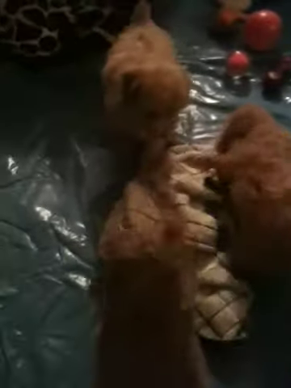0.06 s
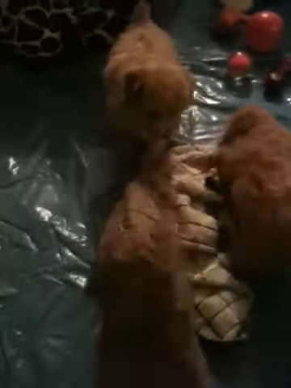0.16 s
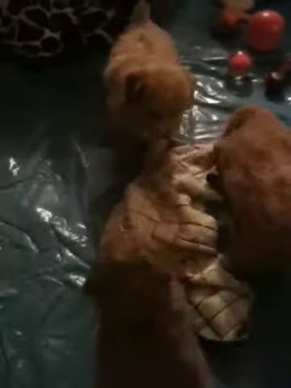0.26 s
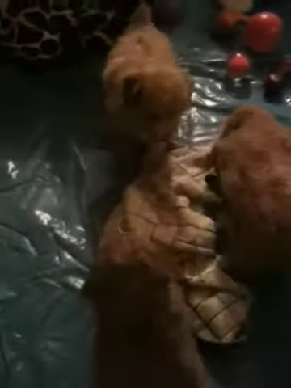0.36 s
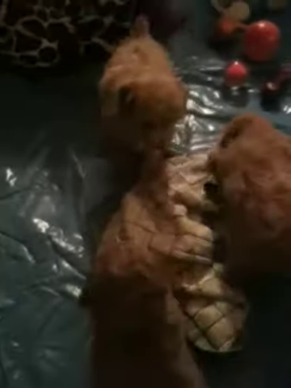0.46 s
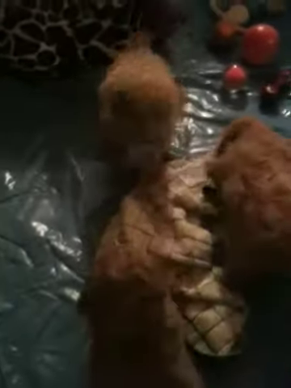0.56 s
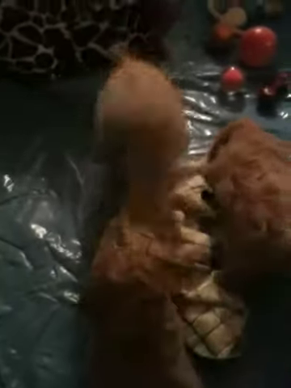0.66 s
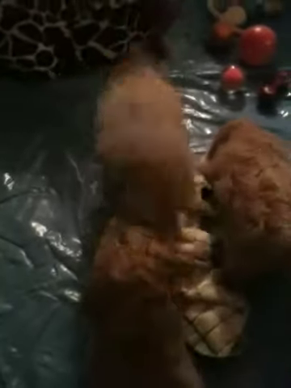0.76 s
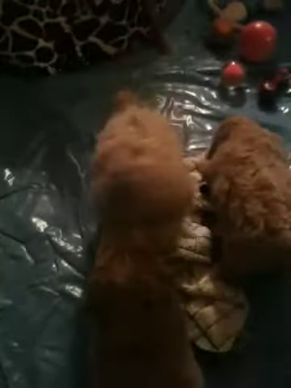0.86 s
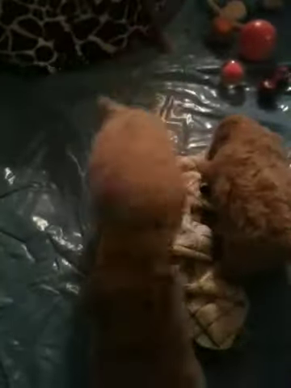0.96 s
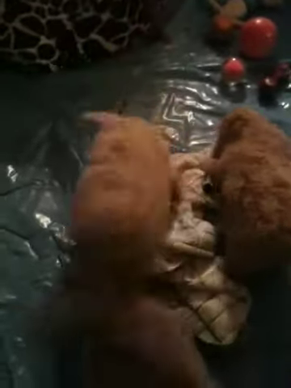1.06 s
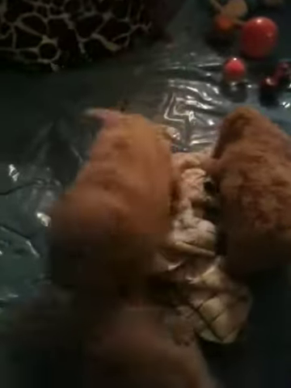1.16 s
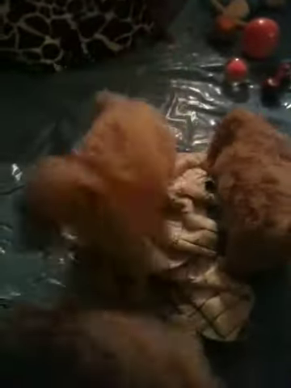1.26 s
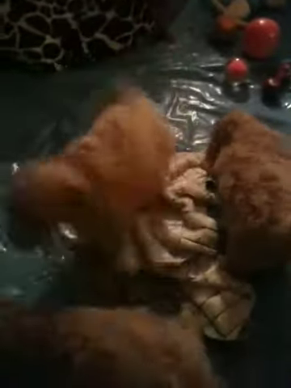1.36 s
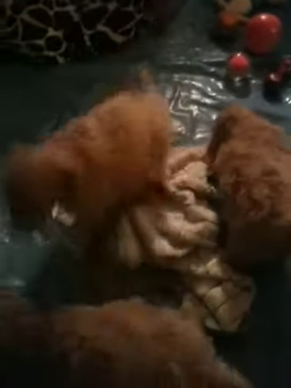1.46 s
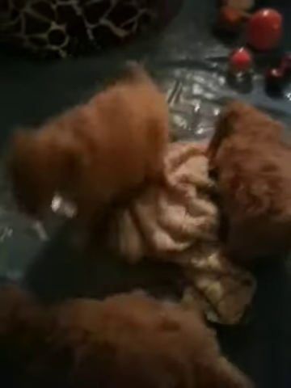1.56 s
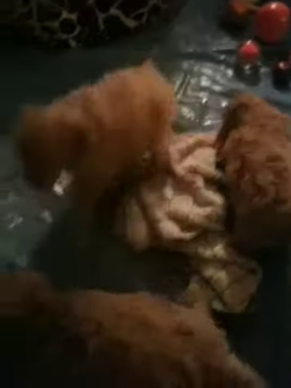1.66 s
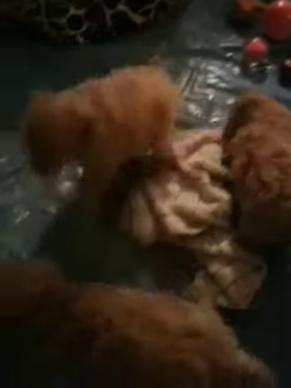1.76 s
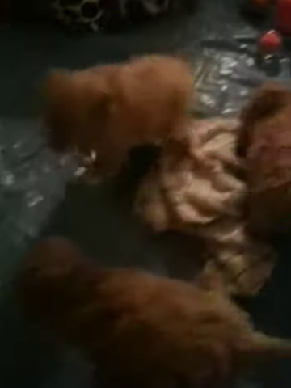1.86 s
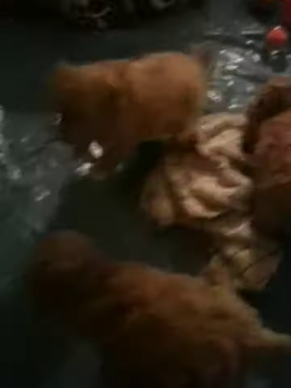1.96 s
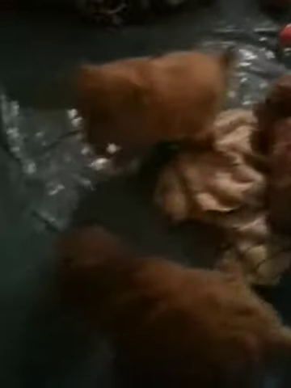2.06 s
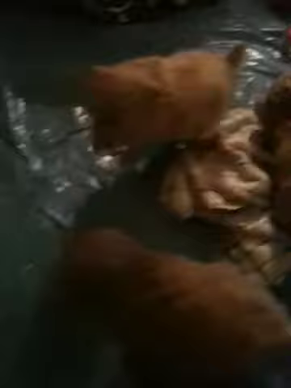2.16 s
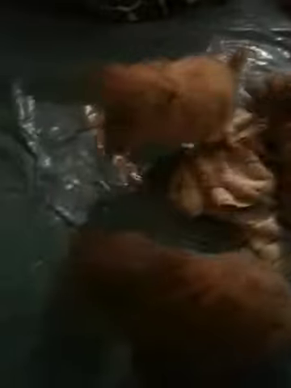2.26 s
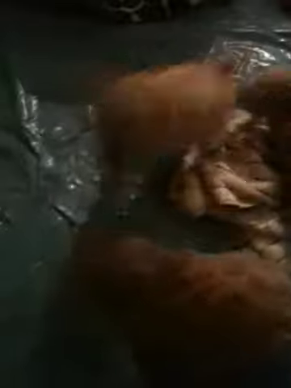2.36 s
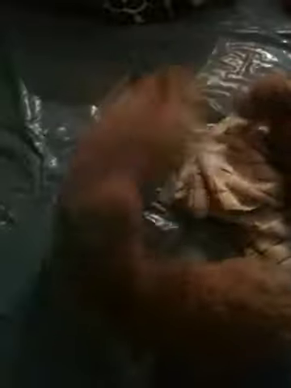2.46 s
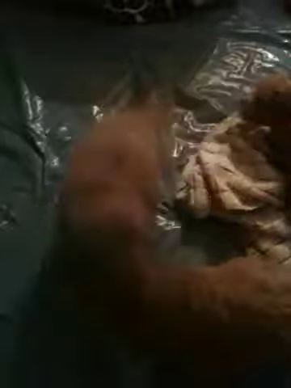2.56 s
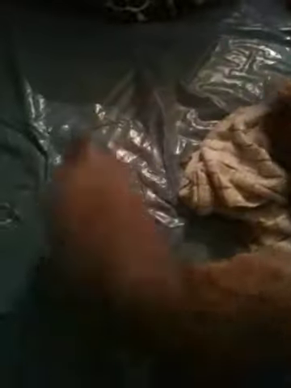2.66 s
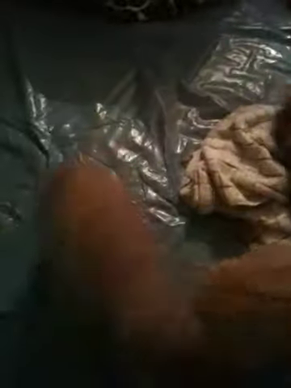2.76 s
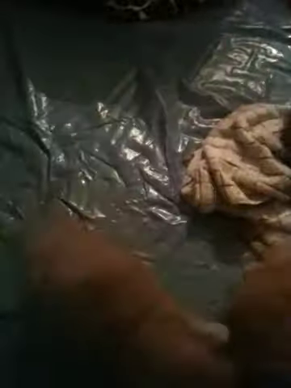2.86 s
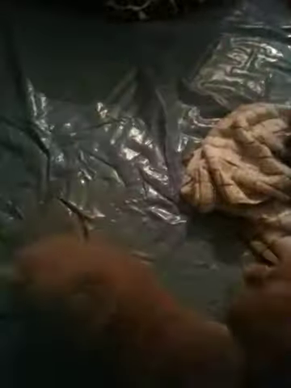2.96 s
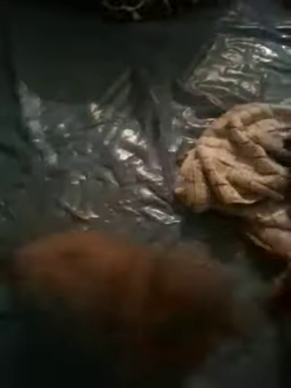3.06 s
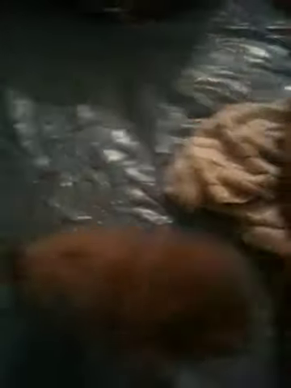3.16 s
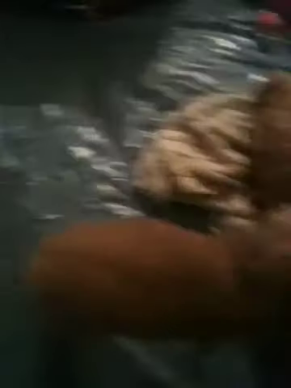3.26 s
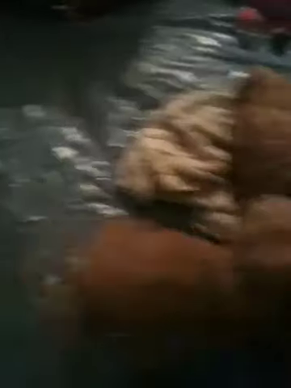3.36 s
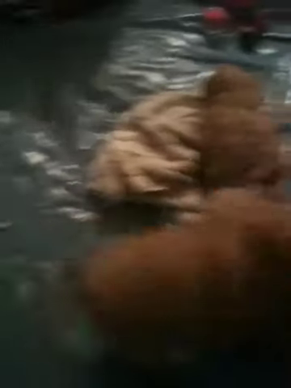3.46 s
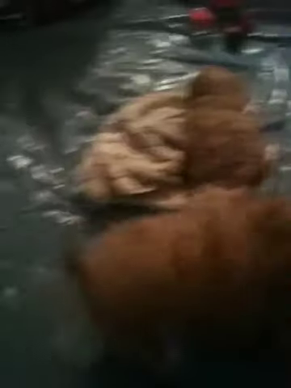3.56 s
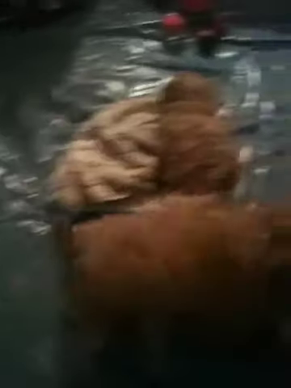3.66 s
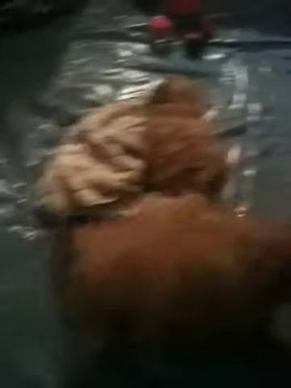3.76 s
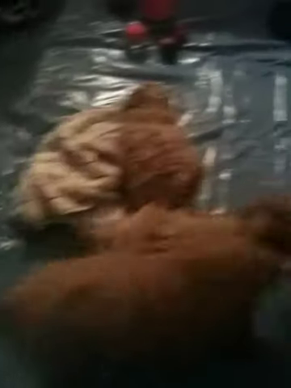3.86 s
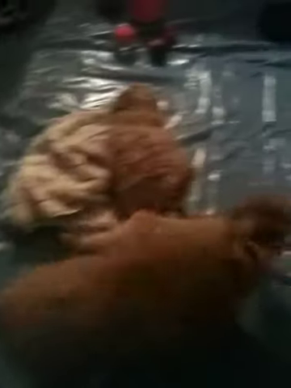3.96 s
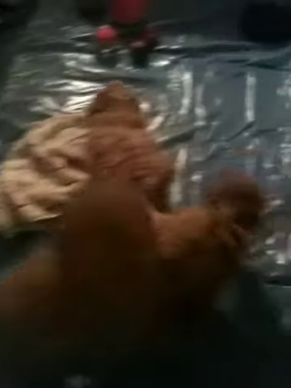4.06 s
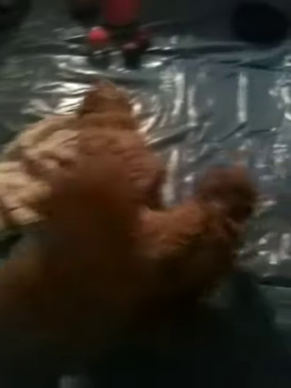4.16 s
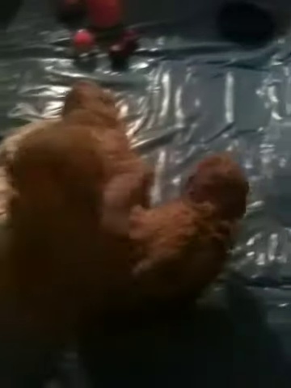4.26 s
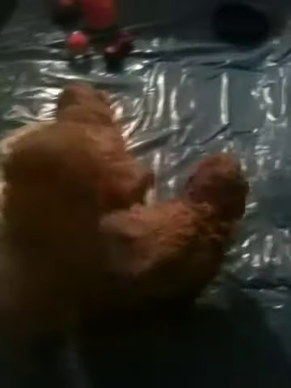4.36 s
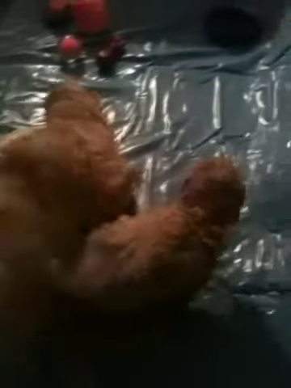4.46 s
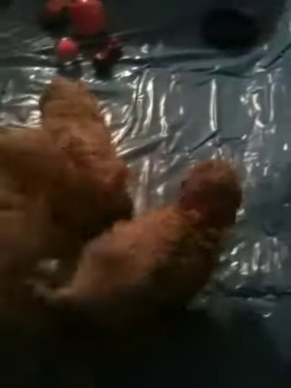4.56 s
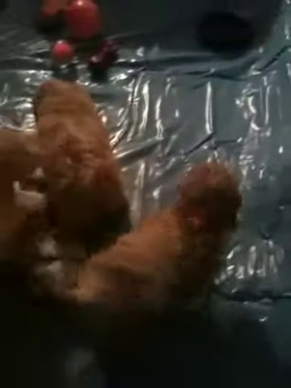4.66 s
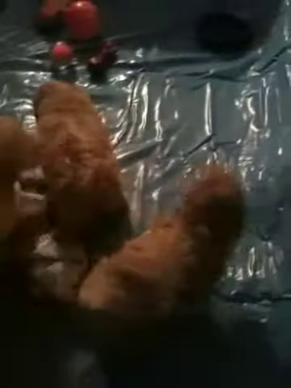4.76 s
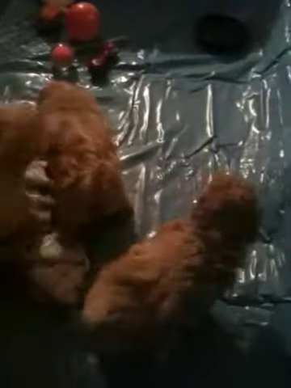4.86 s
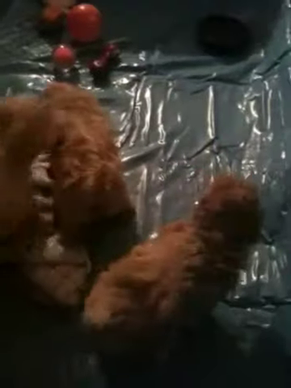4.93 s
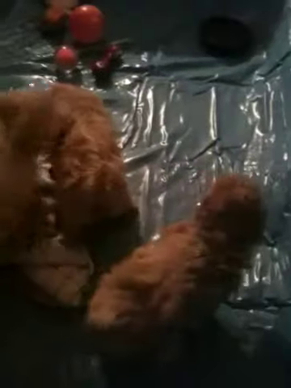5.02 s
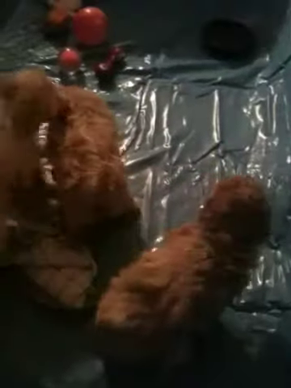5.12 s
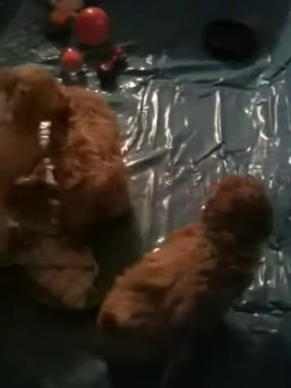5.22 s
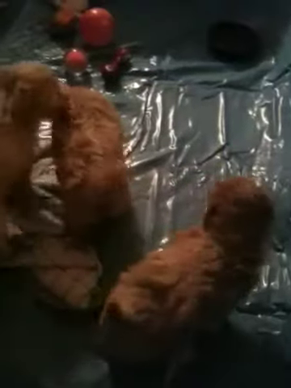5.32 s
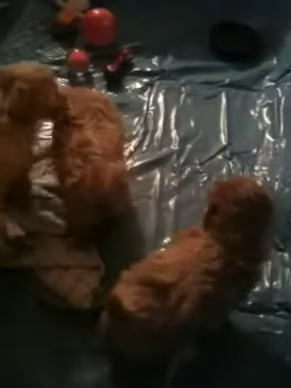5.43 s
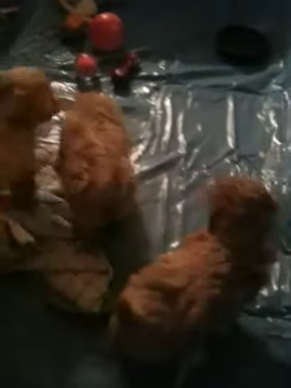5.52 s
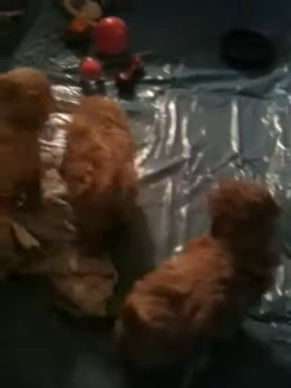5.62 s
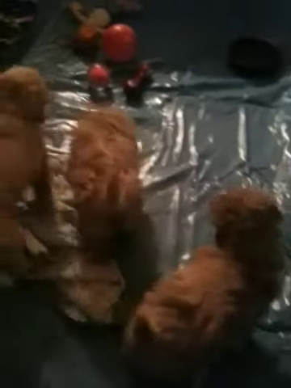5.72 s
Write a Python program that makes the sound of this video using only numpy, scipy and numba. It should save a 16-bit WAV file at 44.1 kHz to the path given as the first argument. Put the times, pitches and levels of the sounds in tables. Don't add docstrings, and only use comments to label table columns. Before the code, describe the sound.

Small puppies growl and give one bark in ragged, fluttering bursts while wrestling on a crinkly plastic sheet in a quiet room.

```python
import sys
import numpy as np
from scipy import signal
from scipy.fft import rfft, irfft, next_fast_len
from scipy.io import wavfile
from scipy.ndimage import uniform_filter1d
from numba import njit

SR = 44100
rng = np.random.default_rng(int(sys.argv[2]) if len(sys.argv) > 2 else 0)


def decibels_to_gain(level_db):
    exponent = np.asarray(level_db, float) / 20
    return 10 ** exponent


def materialize(psi):
    bounded = np.clip(np.atleast_2d(psi).T, -1, 1)
    quanta = np.round(bounded * 32767).astype(np.int16)
    wavfile.write(sys.argv[1], SR, quanta)


N = 255334
TIME = np.arange(N) / SR


def level(x, db):
    return x * decibels_to_gain(db) / np.sqrt(np.mean(x ** 2) + 1e-30)


@njit
def svf(x, hz, width):
    y, b, l = np.empty(len(x)), 0., 0.
    for i in range(len(x)):
        g, k = np.tan(np.pi * hz[i] / SR), width / hz[i]
        v = (b + g * (x[i] - l)) / (1 + g * (g + k))
        b = 2 * v - b
        l += 2 * g * v
        y[i] = k * v
    return y


def band(x, hz, width):
    return svf(x, np.full(len(x), float(hz)), float(width))


def colour(x, table):
    hz, db = np.transpose(table)
    size = next_fast_len(N)
    bins_hz = np.arange(1, size // 2 + 2) * SR / size
    gain = decibels_to_gain(np.interp(np.log(bins_hz), np.log(hz), db))
    return irfft(rfft(x, size) * gain, size)[:N]


def walk(n, rate):
    k = int(SR / rate)
    held = np.repeat(rng.standard_normal(n // k + 1), k)
    return uniform_filter1d(held, k)[:n]


def along(t, table):
    s, *columns = np.transpose(table)
    return [np.interp(t, s, c) for c in columns]


# f/Hz, level/dB per Hz
ROOM_SPECTRUM = [(18, -52.5), (30, -19), (64, -25), (88, -15), (124, -5), (170, 2.5), (499, -5),
                 (2230, -14), (6550, -21.5), (13000, -19), (14800, -16.5), (16000, -29.5)]


def room_tone():
    air = level(colour(rng.standard_normal(N), ROOM_SPECTRUM), -71.5)
    hum = np.sin(2 * np.pi * 119 * TIME + .8 * walk(N, 24)) * decibels_to_gain(1.7 * walk(N, 3.3))
    beat = 2 * np.pi * 30.1 * TIME
    beating = np.cos(beat) + .5 * np.cos(3 * beat)
    whine = np.sin(2 * np.pi * 15000 * TIME) * beating * decibels_to_gain(1.5 * walk(N, 9))
    return air + level(hum, -82) + level(whine, -81)


# chest, mouth, palate, cheek, muzzle, nose, lips
# width/Hz of each
AIRWAY_WIDTHS_HZ = (60., 220., 270., 260., 290., 340., 800.)
BREATH_SHARES = (2.17, 4.6, 7.5, 5.4, 9.1, 2.7, 16)
# f/Hz, width/Hz, share swallowed
POCKETS = [(505, 85, 0.75), (1250, 160, 0.7), (2950, 200, 0.5)]
MOUTH_SHUT_HZ, MOUTH_JAW_HZ = 796, 660
PALATE_EFFORT, PALATE_LIPS, PALATE_JAW_DB = 0.21, .2, 7
PATCHY_DB, WOBBLE, TREBLE_FADE = 2.2, .022, .75
FIRST_FLAP_S = .006


def growl(effort, voice, chest_hz, throat, colours, flutter, gullet, teeth):
    rough, flutter_hz, end_flutter_hz, depth = flutter
    bend, gullet_db, throat_db = gullet
    start_s, end_s = effort[0][0], effort[-1][0]
    start = int(start_s * SR)
    t = TIME[start:int(end_s * SR)]
    n = len(t)
    chest_db, mouth_db, jaw, muzzle_db = along(t, effort)
    voice_hz, partial_db, boom_db = along(t, voice)
    palate_hz, muzzle_hz, nose_hz, lips_hz = along(t, throat)
    palate_db, cheek_db, nose_db, lips_db = along(t, colours)
    mouth_hz = MOUTH_SHUT_HZ + MOUTH_JAW_HZ * jaw
    palate_db = palate_db + PALATE_EFFORT * mouth_db + PALATE_LIPS * muzzle_db + PALATE_JAW_DB * jaw

    flap_hz = np.linspace(flutter_hz, end_flutter_hz, n)
    phase = (np.cumsum(flap_hz) / SR - FIRST_FLAP_S * flutter_hz + .04 * walk(n, 25)) % 1
    opening = np.minimum(phase / .12, 1) * np.clip((.97 - phase) / .3, 0, 1)
    flap = 1 - depth * (1 - opening)

    pitch = voice_hz * (1 + bend * (phase - .5))
    cycles = np.cumsum(pitch * np.exp(.5 * rough * walk(n, 250))) / SR
    pulses = np.diff(np.floor(cycles), prepend=0) * decibels_to_gain(5 * rough * walk(n, 250))
    pulses = level(pulses - pulses.mean(), 0)
    gusts = (1 + .6 * np.cos(2 * np.pi * cycles)) * decibels_to_gain(1.5 * walk(n, 90))
    breath = rough * gusts * rng.standard_normal(n)

    def resonance(air, hz, width, db):
        hz = hz + 0 * t
        for _ in range(3):
            air = svf(air, hz, 2 * width)
        return level(flap * air, 0) * decibels_to_gain(chest_db + db)

    out = resonance(pulses + breath, pitch, 125., partial_db)
    out += resonance(pulses + 3.0 * breath, 340., 150., gullet_db)
    out += resonance(pulses + breath, 780, 340.0, throat_db + mouth_db / 2)
    dbs = (boom_db, mouth_db, palate_db, cheek_db, muzzle_db, muzzle_db + nose_db, muzzle_db + lips_db)
    hzs = (chest_hz, mouth_hz, palate_hz, 2600, muzzle_hz, nose_hz, lips_hz)
    for db, hz, width, share in zip(dbs, hzs, AIRWAY_WIDTHS_HZ, BREATH_SHARES):
        upper = np.clip(hz / MOUTH_SHUT_HZ - 1.5, 0, 1)
        ragged = decibels_to_gain(PATCHY_DB * walk(n, 110)) * (1 - TREBLE_FADE * depth * phase)
        hz = hz * (1 + WOBBLE * upper * walk(n, 60))
        out += (1 + upper * (1.26 * ragged - 1)) * resonance(pulses + share * breath, hz, width, db)
    hiss_db = muzzle_db + along(t, teeth)[0] + 3 * walk(n, 60)
    out += resonance(breath, 11000, 2500., hiss_db)

    out = signal.sosfilt(signal.butter(4, 170, "high", fs=SR, output="sos"), out)
    for hz, width, share in POCKETS:
        out = out - min(share, 1) * band(out, hz, width)
    edge = np.clip(np.minimum(t - start_s, end_s - t) / 0.002, 0, 1)
    return start, out * edge


# t/s, chest level/dB, effort/dB, jaw opening (0-1), lip opening/dB
TAIL = [
    (0.0, -57, -1, 0.06, -7.5),
    (0.09, -54.5, -15.5, 0.03, -34),
    (0.14, -84, -14, .05, -10),
]
BARK = [(0.76, -80, -15, 0.09, -30), (0.766, -53, 2, 0.076, -14), (0.812, -50, 4.5, 0.072, -26),
        (0.826, -47.5, 2.5, 0.28, 7), (0.9, -43, 10, .88, 5.5), (0.955, -45, 19, 0.92, 8.5),
        (1.03, -46, 22.5, 0.98, 15.5), (1.065, -43.5, 14, 0.93, 2.5), (1.146, -42.5, 0.5, 0.15, -15),
        (1.19, -63.5, 2.5, .2, -23)]
SECOND = [
    (1.36, -70, -10, .27, -3),
    (1.363, -50, 7, 0.29, -9),
    (1.5, -43.5, -3, 0.27, -2),
    (1.662, -51, 1.5, .26, -4),
    (1.715, -75, -14, 0.17, 2),
]
RUMBLE = [(1.94, -71, -15, .07, -7), (1.956, -55, -2, .01, 1), (2.29, -57, -2.5, .03, -11),
          (2.37, -57, 9, 0.27, -14), (2.41, -55.5, -1, 0.34, -12), (2.45, -70, 1, 0.54, -14)]
SNARL = [(2.73, -59.5, -5, .38, -4), (2.762, -49.5, 10, .2, 0.5), (2.86, -43.5, 2, 0.91, -4.5),
         (2.9, -44, 3.5, 1.04, -0.5), (3.034, -46.5, 6.5, 1.15, 2), (3.11, -48, 2.5, 0.97, 2),
         (3.14, -49, 3, 0.55, -9), (3.24, -52, 0.3, .08, -28), (3.29, -82, -2, .1, -10)]
LAST = [(3.47, -62.5, 1.5, 0.18, -3), (3.506, -50, 5, 0.14, -24), (3.62, -48, 10, 0.33, 0.5),
        (3.7, -48.5, 6, 0.37, -0.5), (3.776, -46.5, 2.5, 0.83, -13), (3.87, -73, -9, .5, -4)]
YAP = [(3.9, -67, -11, .02, -26), (3.92, -55, -7, 0.028, -37), (4.002, -46, -.6, 0.16, -36),
       (4.036, -49.5, -4.5, 0.33, -31), (4.05, -61, -8, .15, -20), (4.09, -72.5, -9, .15, -2)]
# t/s, pitch f/Hz, first partial level/dB, chest band level/dB
VOICES = [
    [(0.0, 290, 1.5, -2), (.14, 230.5, 0, 0)],
    [(.76, 224.8, -10.5, 0), (1.19, 265.2, -8, 1)],
    [(1.36, 300.3, -5, 0), (1.5, 280.2, -4, 2.5), (1.58, 249.6, -1, -3.5), (1.66, 227.6, 2, -3.5),
     (1.73, 185, 1, -1)],
    [(1.94, 238, 0, 0.5), (2.28, 258, 0, 0.5), (2.34, 312, 0, -3), (2.45, 322, -1, -3)],
    [(2.73, 299.9, -2, -2), (3.24, 335, -2, -3), (3.3, 238, 7, -4)],
    [(3.47, 290.2, 0, -1), (3.55, 284.7, 0, 1.5), (3.76, 262.1, -0.5, 1.5), (3.87, 204.5, 3, -5)],
    [(3.9, 245.1, -6, 0.5), (3.99, 280, -4.5, 0), (4.09, 224.5, -2, -4)],
]
CHESTS_HZ = (410, 414, 397, 420, 387.4, 390, 390)
# t/s, palate f/Hz, muzzle f/Hz, nose f/Hz, lips f/Hz
THROATS = [
    [(0.0, 2040, 5100, 6600, 7220)],
    [(.8, 1970, 3700, 5000, 5900), (.87, 2010, 3660, 4980, 6260), (.91, 2110, 3600, 4880, 7600),
     (.955, 1760, 3450, 4640, 7700), (1.01, 1730, 3130, 4000, 7550), (1.06, 2050, 3200, 4060, 7060),
     (1.16, 2089, 3300, 4400, 7000)],
    [(1.36, 1710, 4000, 5100, 7220), (1.43, 1800, 3870, 5000, 7150), (1.47, 1780, 4210, 5000, 7220),
     (1.7, 1880, 4260, 5760, 7220)],
    [(1.94, 2086, 5970, 3200, 5780), (2.3, 2050, 5800, 3300, 5760), (2.45, 1948, 5900, 3600, 5500)],
    [(2.76, 1500, 3650, 4560, 7220), (2.81, 1680, 3700, 4700, 7220), (2.855, 1845, 3880, 5300, 7220),
     (2.9, 1900, 3910, 4550, 7220), (2.99, 1840, 3594, 4380, 7220), (3.07, 1810, 3890, 4850, 7260),
     (3.12, 1820, 3900, 4900, 7220), (3.16, 1910, 4400, 5200, 7220), (3.3, 2100, 4200, 5200, 7220)],
    [(3.47, 2100, 4170, 5000, 7220), (3.6, 1890, 4020, 5030, 7220), (3.7, 1900, 4020, 5200, 7220),
     (3.78, 1750, 3924, 5200, 7220)],
    [(3.9, 2010, 3850, 6150, 7220)],
    [(0.0, 2275, 3900, 5900, 7220)],
]
# t/s, palate and cheek level/dB over chest,
# nose and lip hiss level/dB over muzzle
COLOURS = [
    [(0.0, -1.3, -24, 2.5, -2.5)],
    [(.8, 3, -14, -3, -1), (.9, 1, -1, -4, -1), (.96, -2, 2, -6, -9.5), (1.03, 0.5, 4, -3.5, -19.5),
     (1.12, -2, -14, 6.5, -3)],
    [(1.37, 1.5, -12, -6, -3), (1.5, -2, -11, -13, -11.5), (1.66, -2, -12, -10, -6)],
    [(1.95, -4.5, -9, -12.5, -3), (2.28, -4, -16.5, -6, 0), (2.4, -6, -12, 0, -4)],
    [(2.76, -5, -7, 1, -13), (2.86, -10, -9, -1, -10), (2.95, -5.5, -8, -4, -11),
     (3.08, -6.5, -4.5, -3.5, -13.5), (3.22, -9, -10, 3.5, -11)],
    [(3.5, -2, -19, -10, -15), (3.62, -3, 1.5, -7, -17), (3.72, -1, 1, -8, -15), (3.8, -2.5, -12, -5, -13)],
    [(3.9, -7, -24, -8, -19)],
    [(0.0, 0, -18, -3, -13)],
]
# roughness (0-1), flutter f/Hz at start and end, depth (0-1)
FLUTTERS = [(.15, 23, 23, .7), (.24, 31, 32, .55), (.12, 30, 28, .65), (.18, 27.8, 24.8, .95),
            (.22, 31.5, 25.5, .6), (.22, 29.5, 27, .55), (.18, 28, 28, .45), (.13, 28, 27, .6)]
# pitch rise within a flap (share), gullet and throat level/dB over chest
GULLETS = [(.24, -6, -4), (.3, -4, -5), (.26, -9, -10), (.26, -5, -5), (.42, -11, -2.5), (.36, -6, -3.5),
           (.3, -8, -4), (.2, 0, -5)]
# t/s, hiss level/dB over muzzle
TEETH = [
    [(0.0, -17)],
    [(.82, -34), (.9, -24), (1.0, -22), (1.07, -14), (1.14, -6)],
    [(1.4, -19), (1.7, -17)],
    [(1.95, -20)],
    [(2.76, -20), (3.0, -19), (3.2, -17)],
    [(3.5, -20), (3.7, -17)],
    [(3.9, -19)],
    [(0.0, -19)],
]


def long_growls():
    out = np.zeros(N)
    efforts = [TAIL, BARK, SECOND, RUMBLE, SNARL, LAST, YAP]
    for call in zip(efforts, VOICES, CHESTS_HZ, THROATS, COLOURS, FLUTTERS, GULLETS, TEETH):
        i, sound = growl(*call)
        out[i:i + len(sound)] += sound
    return out


# f/Hz, level/dB per Hz
SHEET_SPECTRUM = [(200, -53), (500, -8.5), (1200, -3), (2500, 2), (4500, -2.5), (6800, 3.5), (9000, -2.5),
                  (12500, -14), (16000, -38)]
# peak t/s, peak
# level/dB, rise/s and fall/s per 20 dB, lower band tilt/dB
DRAGS = [(0.0, -64.5, .1, 0.34, -5.5), (.444, -65.5, 0.38, 0.06, -1.5), (.617, -64, 0.02, 0.03, -3.5),
         (.68, -70, .3, .3, 0), (4.25, -77, .2, .2, 0), (5.24, -72, .1, .2, 0),
         (.775, -62.5, .022, 0.2, -3), (.87, -47.5, .06, 0.24, 4), (1.1, -47, 0.24, 0.01, 1),
         (1.17, -50, .022, 0.01, -7), (1.231, -52, .03, 0.05, 1.5), (1.47, -54.5, 0.27, .5, .3),
         (1.81, -62.5, 0.025, 0.2, 2), (2.03, -67, 0.14, 1.3, -1), (2.36, -61.5, 0.055, 1.6, -1.5),
         (2.78, -51, 0.018, 0.61, -0.8), (3.39, -60, .15, .025, -3.5), (3.47, -66, 0.056, 0.14, .3),
         (3.71, -48.5, 0.33, 0.06, 0.5), (3.8, -55.5, .025, 0.0263, 5), (3.88, -63.5, 0.028, 0.2, -16),
         (4.108, -55.5, 0.22, 0.07, -3), (4.47, -62, .1, .14, 2), (4.64, -61, 0.074, 0.33, 5),
         (4.84, -53, 0.0093, 0.1, -13), (4.911, -49, 0.035, 0.06, 4), (5.174, -59.5, 0.073, 0.03, 1),
         (5.342, -65.5, .09, 0.32, 0.1)]
SHEET_REST_DB = -85


def rustle():
    chance = rng.random((3, N))
    struck = chance[0] < 1500 / SR
    ticks = struck * decibels_to_gain(-2.5 * np.log(chance[1] + 1e-9)) * np.sign(chance[2] - .5)
    sheet = level(colour(level(ticks, -0.5) + rng.standard_normal(N), SHEET_SPECTRUM), 2.9)
    low = signal.sosfilt(signal.butter(4, 5000, fs=SR, output="sos"), sheet)
    high = signal.sosfilt(signal.butter(4, 5000, "high", fs=SR, output="sos"), sheet)
    s, db, rise_s, fall_s, tilt_db = np.transpose(DRAGS)[:, :, None]
    t = TIME[::64]
    power = decibels_to_gain(db - 20 * np.maximum((s - t) / rise_s, (t - s) / fall_s)) ** 2

    def motion(power):
        total = uniform_filter1d(power.sum(axis=0), size=7) + decibels_to_gain(SHEET_REST_DB) ** 2
        return np.interp(TIME, t, np.sqrt(total))

    moved = high * motion(power) + low * motion(power * decibels_to_gain(tilt_db) ** 2)
    return moved * decibels_to_gain(2.0 * walk(N, 40))


def ring(n, hz, t60):
    t = np.arange(n) / SR
    return np.sin(2 * np.pi * hz * t) * decibels_to_gain(-60 * t / t60)


# t/s, peak level/dB, ring f/Hz, t60/s
PAW_FALLS = [
    (0.134, -44, 756, 0.02),
    (0.242, -47, 144, 0.067),
    (0.28, -53, 159, 0.095),
    (0.45, -47.5, 135, 0.039),
    (2.659, -49.5, 225, 0.18),
    (2.7, -41.5, 222, 0.067),
    (3.299, -51.5, 233, 0.086),
    (5.459, -50, 805, 0.026),
]
# t/s, peak level/dB, ring f/Hz, t60/s
LOW_BUMPS = [(.25, -66, 75, .2), (.786, -62, 50, .12), (1.14, -66, 55, .1), (1.397, -63, 50, .15),
             (1.94, -70, 55, .1), (2.13, -72, 38, .12), (2.398, -69, 42, .1), (2.68, -70, 50, .1),
             (2.75, -64, 48, .1), (2.843, -62, 45, .12), (2.8, -58, 95, .15), (2.66, -66, 70, .1),
             (2.948, -65, 52, .1), (3.222, -70, 44, .1), (3.475, -67, 55, .1), (3.559, -64, 58, .1),
             (3.761, -64, 46, .12), (3.97, -68, 42, .12), (4.422, -70, 48, .1), (4.676, -74, 40, .1),
             (4.871, -72, 55, .1)]


def thuds():
    n = 8000
    out = np.zeros(N + n)
    for s, db, hz, t60 in PAW_FALLS + LOW_BUMPS:
        i = int(s * SR)
        onset = np.minimum(np.arange(n) / SR * hz / 1.84, 1)
        out[i:i + n] += decibels_to_gain(db) * ring(n, hz, max(t60, .01)) * onset
    return out[:N]


SLIP_S, SLIP_DB, SLIP_SHRINK = 0.0047, -30, .3


def crack(db, hz, treble_db):
    t = np.arange(3000) / SR - .004
    length = SLIP_S * decibels_to_gain(SLIP_SHRINK * (SLIP_DB - db))
    noise = rng.standard_normal((2, len(t))) * decibels_to_gain(1.5 * walk(len(t), 930))
    slip = np.exp(-.6 * t / length) * np.exp(-np.clip(t - length, 0, None) / 0.002)
    settling = decibels_to_gain(-24.5) * np.exp(-t / .018)
    shape = np.where(t < 0, .25 * np.exp(t / 0.0013), slip + settling)
    first, second = noise * shape
    panel = band(first, hz, 0.15 * hz) + 0.3 * band(second, 3700, 2778) + 0.045 * band(first, 700, 910)
    spray = band(band(second, 5600, 6000), 6070, 4700)
    return decibels_to_gain(db - 2) * (panel / np.abs(panel).max() + decibels_to_gain(treble_db) * spray / np.abs(spray).max())


# t/s, peak level/dB, ring f/Hz
SNAPS = [(0.179, -46, 2430), (0.826, -32, 2060), (1.168, -25, 2820), (1.2297, -24.5, 6900),
         (1.797, -35.5, 6820), (2.505, -41, 4080), (2.5146, -28, 3900), (2.579, -27.5, 6300),
         (2.6557, -24.5, 3780), (2.6927, -31, 5570), (2.969, -22, 3550), (3.2332, -35, 6300),
         (3.321, -43, 3330), (4.461, -55, 4980), (4.535, -46, 1300), (4.5586, -44, 6760),
         (4.57, -35.5, 4400), (4.717, -41, 3220), (4.838, -25, 6750), (5.013, -52, 2220),
         (5.343, -40.5, 6150), (5.5045, -51, 3180)]
# t/s, peak level/dB, ring f/Hz
CRINKLES = [(0.389, -47, 4380), (0.429, -40.5, 3230), (0.4374, -51, 2100), (1.1134, -29.5, 2100),
            (1.179, -38, 5000), (1.3427, -36.5, 3840), (1.3965, -35, 4500), (1.413, -38, 5800),
            (1.508, -36, 3500), (2.333, -38, 3356), (2.347, -44, 6000), (2.412, -29.5, 3070),
            (2.773, -29.5, 4440), (2.787, -35, 5800), (2.8484, -24, 3850), (3.341, -46, 3000),
            (3.379, -40.5, 5450), (3.3853, -32.5, 3830), (3.4335, -33.5, 3750), (3.463, -41, 4000),
            (3.47, -23.5, 4100), (3.481, -38, 5500), (3.53, -36, 3700), (3.586, -31.5, 2550),
            (3.7944, -25.5, 3970), (3.866, -45, 2600), (3.873, -32, 4330), (3.953, -42, 3470),
            (3.9873, -44, 6720), (4.4364, -41, 4000), (4.488, -33, 6400), (4.676, -39.5, 3820),
            (4.7272, -31, 3770), (4.7783, -35, 3930), (4.852, -41, 2400), (4.898, -34, 3000),
            (4.916, -41, 2480), (5.036, -54, 5500), (5.168, -44, 6800), (5.184, -48, 2300),
            (5.47, -44.5, 2320)]


def cracks():
    out = np.zeros(N + 3000)
    for table, treble_db in [(SNAPS, -23), (CRINKLES, -3.5)]:
        for s, db, hz in table:
            i = int((s - .004) * SR)
            out[i:i + 3000] += crack(db, hz, treble_db)
    return out[:N]


# start t/s, length/s, level/dB, pitch f/Hz, effort/dB
GRUNTS = [
    (4.212, .055, -66, 320, -6.5),
    (4.364, 0.082, -59, 270.2, 1),
    (4.591, 0.096, -53, 262, -6.5),
    (4.871, 0.045, -58, 340, -25),
    (5.137, 0.027, -67, 278, -17),
]
ATTACK_S, RELEASE_S, RISE_DB, SWELL_DB, FALL_DB = 0.013, 0.045, 17, 2.5, 24
GRUNT_JAW, GRUNT_LIPS_DB, GRUNT_CHEST_HZ, GRUNT_PARTIAL_DB, PITCH_SAG = .05, -17.5, 540, -1, .88


def grunts():
    out = np.zeros(N)
    for start_s, length_s, db, hz, effort_db in GRUNTS:
        end_s = start_s + length_s
        shape = [(start_s, -RISE_DB),
                 (start_s + ATTACK_S, -SWELL_DB),
                 (start_s + 0.66 * length_s, SWELL_DB),
                 (end_s, -SWELL_DB),
                 (end_s + RELEASE_S, -FALL_DB)]
        effort = [(s, db + step_db, effort_db, GRUNT_JAW, GRUNT_LIPS_DB) for s, step_db in shape]
        voice = [(start_s, hz, GRUNT_PARTIAL_DB, 0), (end_s, PITCH_SAG * hz, GRUNT_PARTIAL_DB, 0)]
        i, sound = growl(effort, voice, GRUNT_CHEST_HZ, THROATS[-1], COLOURS[-1], FLUTTERS[-1],
                         GULLETS[-1], TEETH[-1])
        out[i:i + len(sound)] += sound
    return out


def walls(near, t60_s=0.16, wet_db=-14):
    t = TIME[:SR // 2]
    tail = band(rng.standard_normal(len(t)), 1000, 4100) * decibels_to_gain(-60 * t / t60_s) * (t > .004)
    return decibels_to_gain(wet_db) * signal.fftconvolve(near, tail / np.sqrt(np.sum(tail ** 2)))[:N]


def scene():
    tone = room_tone()
    near = long_growls() + rustle() + thuds() + cracks() + grunts()
    return (near + walls(near) + tone)[None]


def roll_off(x):
    return signal.sosfilt(signal.butter(12, 15830, fs=SR, output="sos"), x)


def record(dry):
    x = .7 * np.tanh(dry / .7)
    x = signal.sosfilt(signal.butter(2, 36, "high", fs=SR, output="sos"), x)
    x = signal.sosfilt(signal.ellip(8, .2, 60, 15800, fs=SR, output="sos"), x)
    return roll_off(x)


dry = scene()
out = record(dry)
materialize(out)
```